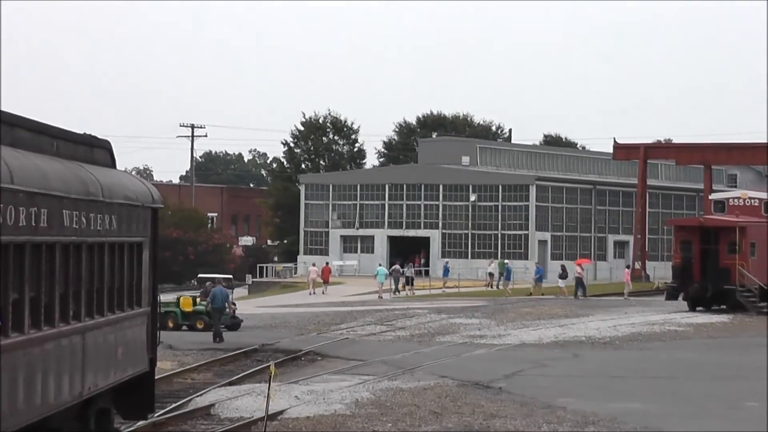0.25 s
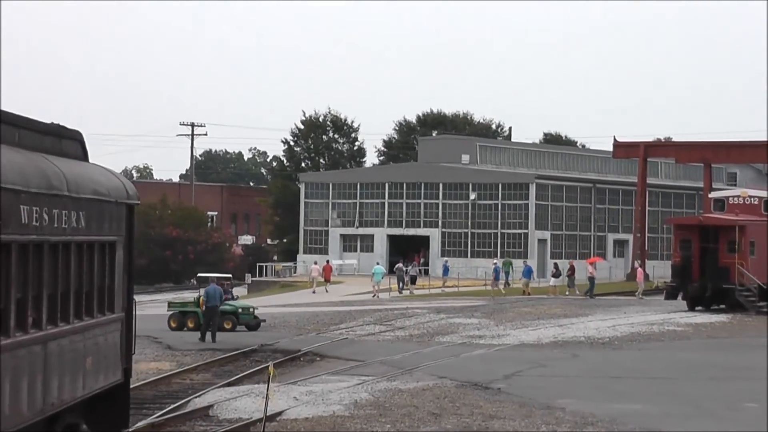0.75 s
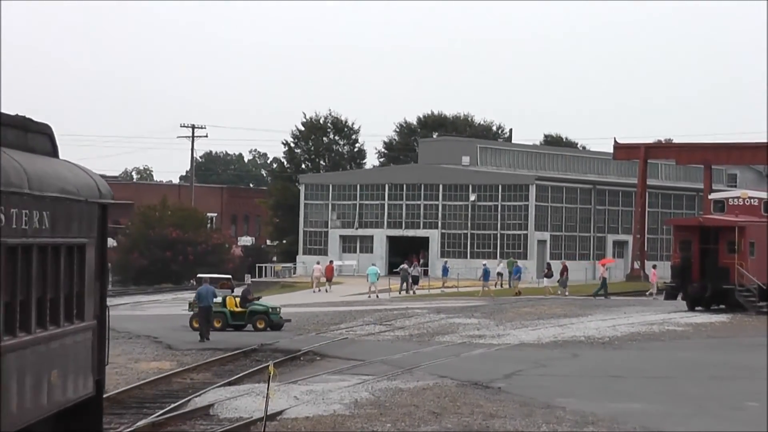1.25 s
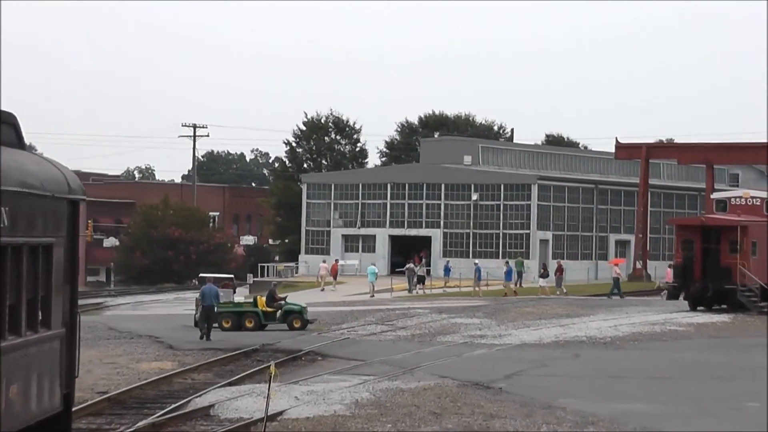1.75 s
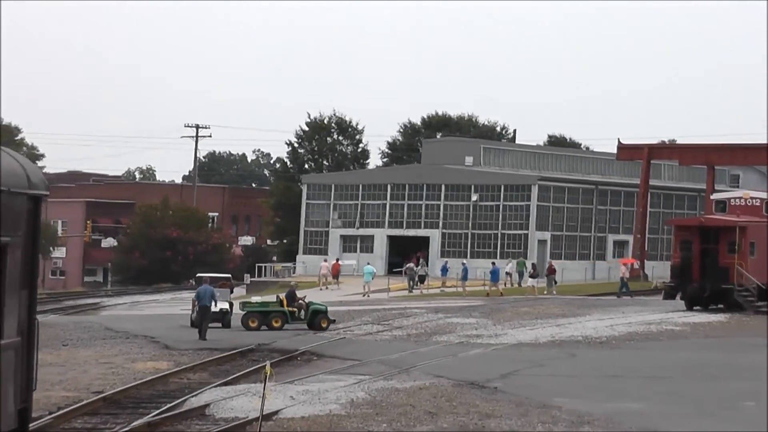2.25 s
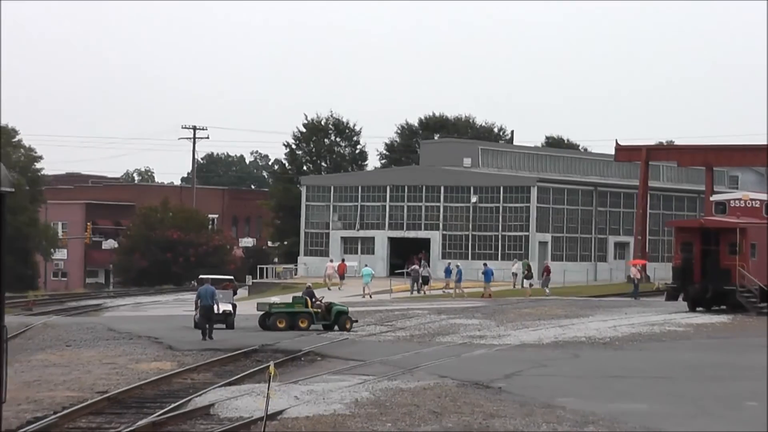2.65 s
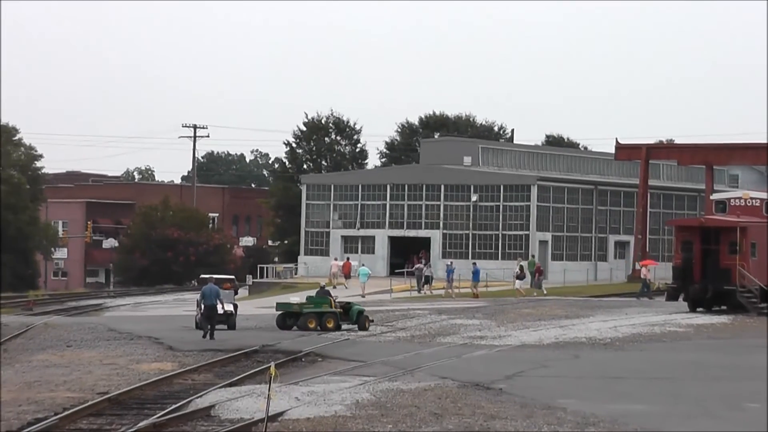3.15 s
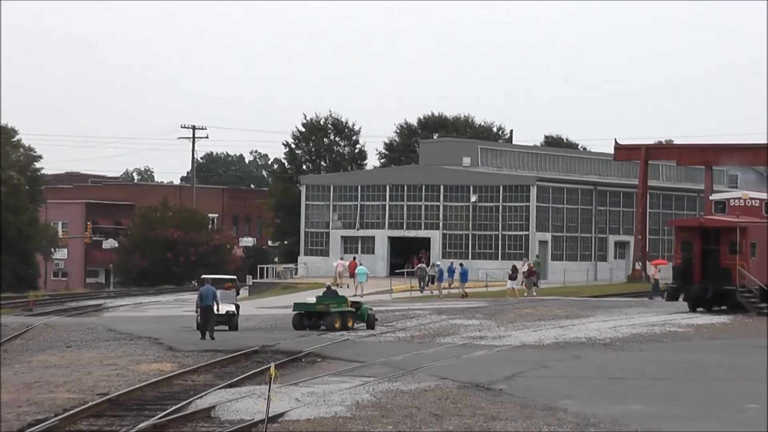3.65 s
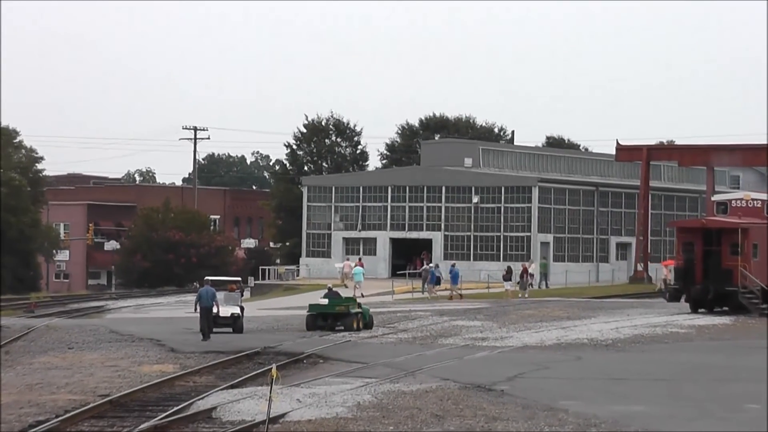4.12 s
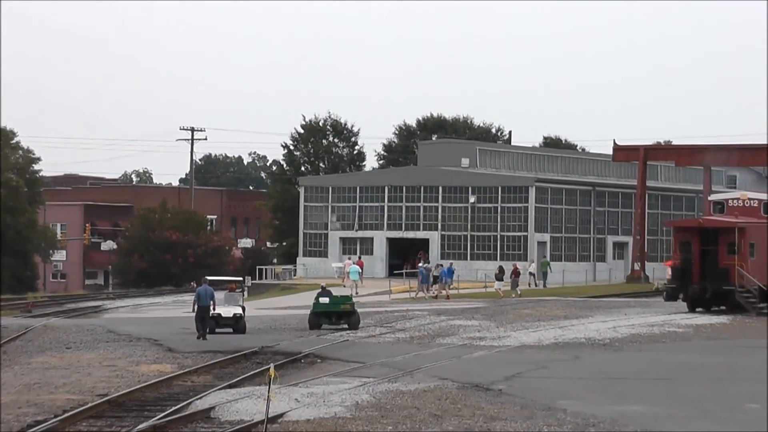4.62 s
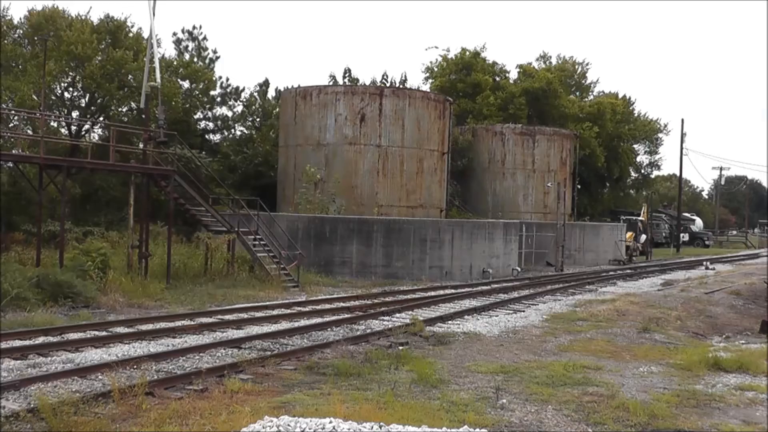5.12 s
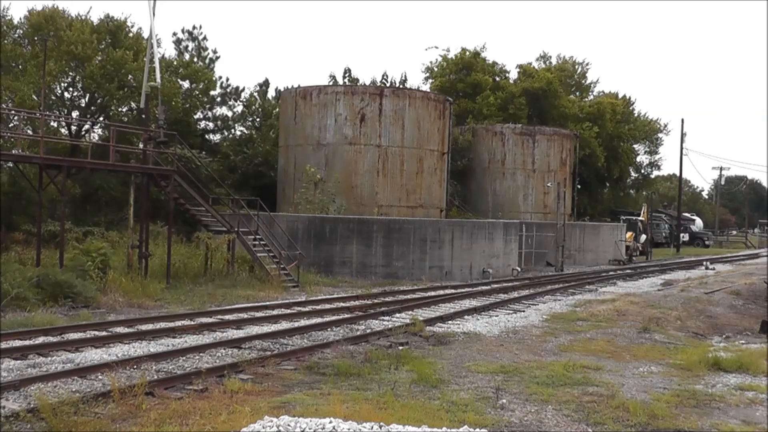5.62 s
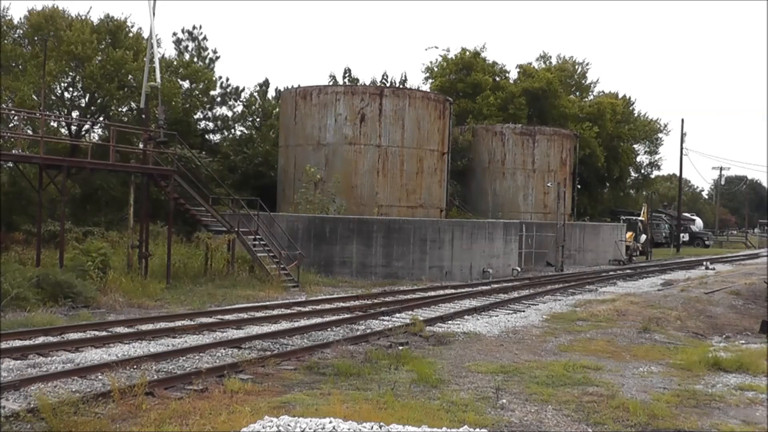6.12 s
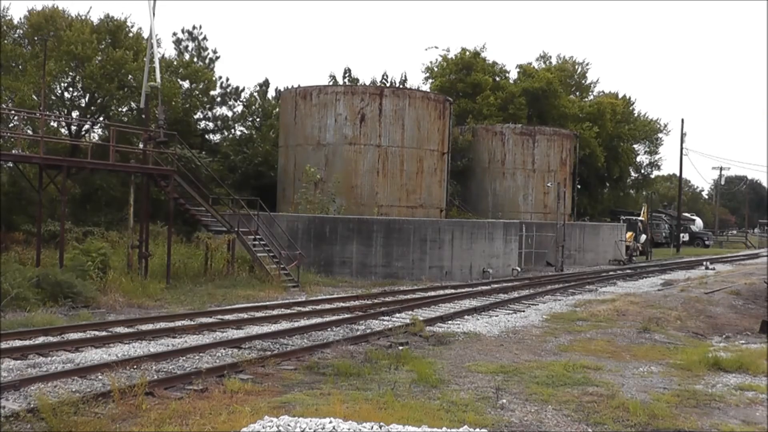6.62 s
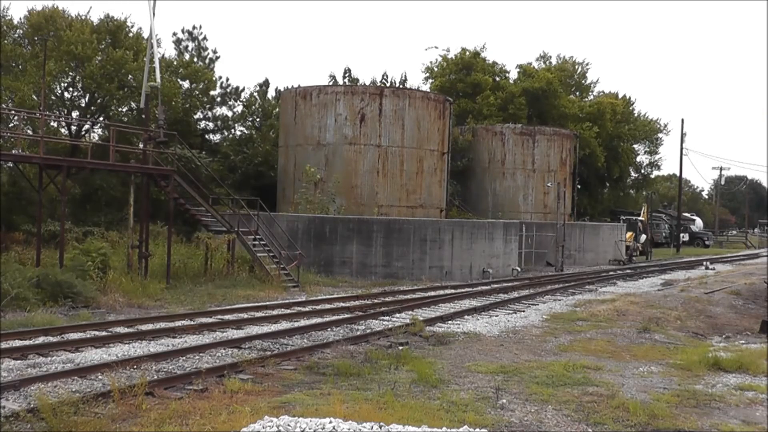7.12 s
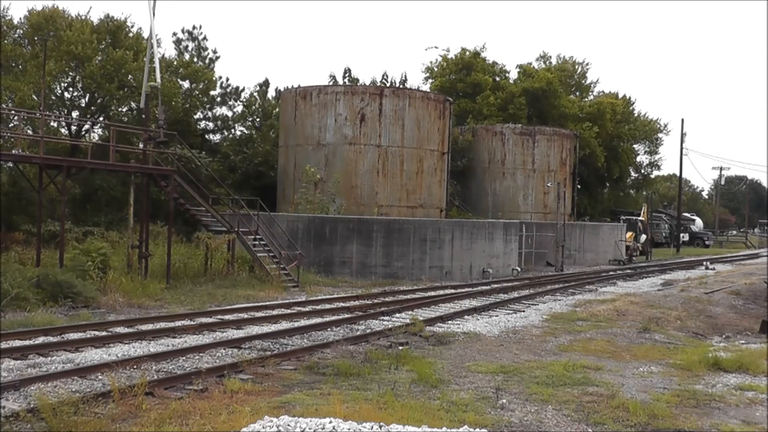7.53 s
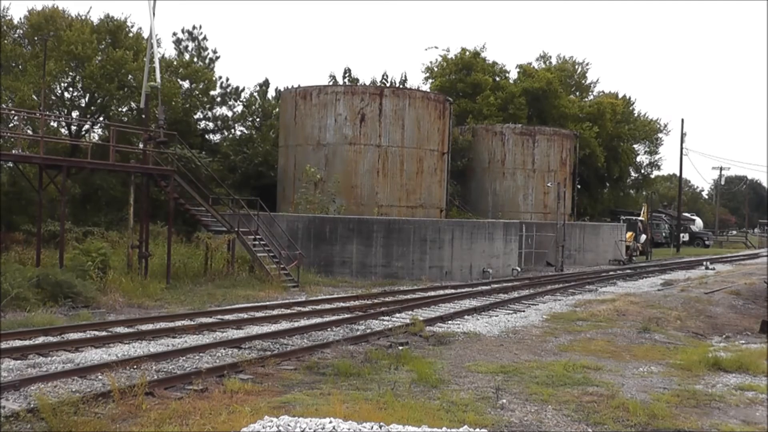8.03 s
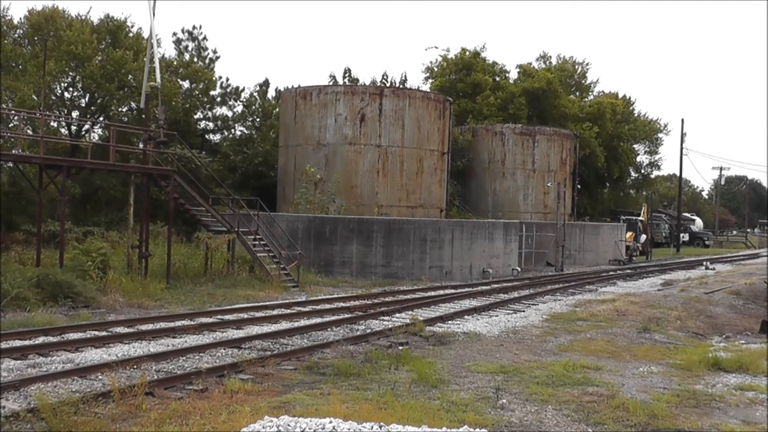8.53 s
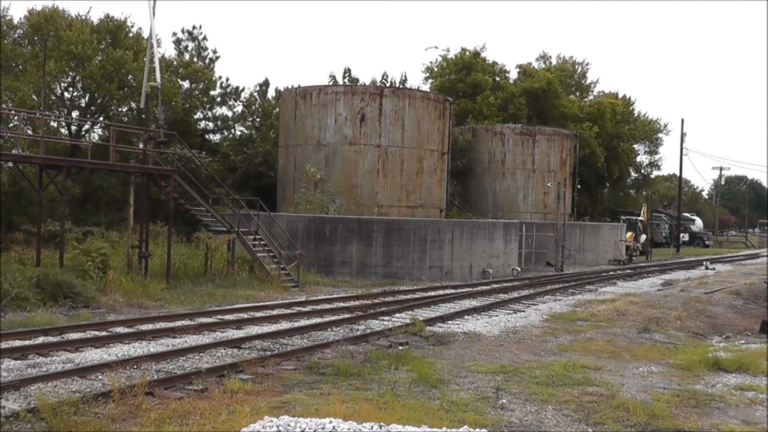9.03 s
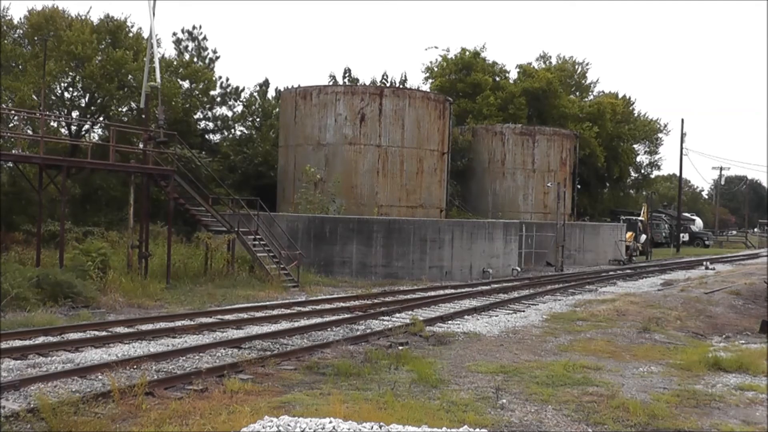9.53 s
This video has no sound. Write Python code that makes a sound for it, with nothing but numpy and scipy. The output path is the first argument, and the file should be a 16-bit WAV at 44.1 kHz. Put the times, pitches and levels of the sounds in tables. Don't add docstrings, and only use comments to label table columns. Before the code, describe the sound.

Close heavy wheels rumble, clank and squeak over rail joints, cut to silence, then far-off rolling fades up with a chirping cricket.

```python
import sys
import numpy as np
from scipy import signal
from scipy.fft import rfft, irfft
from scipy.io import wavfile
from scipy.ndimage import uniform_filter1d

SR = 44100
rng = np.random.default_rng(int(sys.argv[2]) if len(sys.argv) > 2 else 0)


def unload_wav(signal):
    wavfile.write(
        sys.argv[1],
        SR,
        np.round(np.clip(np.atleast_2d(signal).T, -1, 1) * 32767).astype(np.int16),
    )


def volts(x):
    e = np.asarray(x, float) / 20
    return 10 ** e


N = 430857
TIME, HZ = np.arange(N) / SR, np.fft.rfftfreq(N, 1 / SR)


def over_hz(table, hz=HZ):
    f, v = np.transpose(table)
    return np.interp(np.log(hz + 1), np.log(f), v)


def add(track, start_s, sound):
    i = int(start_s * SR)
    track[i:i + len(sound)] += sound[:N - i]


def band(x, lo_hz, hi_hz, order=2):
    sos = signal.butter(order, [lo_hz, min(hi_hz, .45 * SR)], "bandpass", fs=SR, output="sos")
    return signal.sosfilt(sos, x)


def patches(shape, size):
    field = uniform_filter1d(rng.standard_normal(shape), size[0], axis=0)
    field = uniform_filter1d(field, size[1], axis=1)
    return field / field.std()


def thin_hiss(curve, tilt_db):
    # pitch in Hz, level in dB per Hz
    hiss_colour = [(6500, -30), (9000, 0), (11500, -7), (13300, -11), (15600, -17)]
    colour_db = over_hz(hiss_colour) + tilt_db * HZ / 15000
    hiss = irfft(rfft(rng.standard_normal((2, N))) * volts(colour_db), N)
    puff_start_s, puff_end_s, puff_db = 2.435, 2.6, -53
    puff_times = [puff_start_s - .01, puff_start_s, puff_end_s, puff_end_s + .02]
    puff = volts(puff_db) * np.interp(TIME, puff_times, [0, 1, .7, 0])
    steady = volts(np.interp(TIME, *np.transpose(curve)) - 7)
    return hiss / hiss.std() * (steady + puff)


def cricket():
    # start in seconds, level in dB
    chirp_rows = [
        (5.335, -82),
        (5.637, -71),
        (5.948, -68),
        (6.262, -67),
        (6.55, -68),
    ]
    pitch_hz, gap_s, pulse_s = 6830, .0275, .014
    out, t = np.zeros(N), TIME[:int(pulse_s * SR)]
    stroke = np.hanning(len(t)) * np.sin(2 * np.pi * pitch_hz * t)
    for s, db in chirp_rows:
        for k, stroke_db in enumerate((6, 6.5, 4, 7)):
            add(out, s + k * gap_s, volts(db + stroke_db) * stroke)
    return out


def rolling(curves, parts_db, colour, rings, grit_hz, grit_db, spread_db, patchy_db, flicker_db):
    edges = (60, 280, 900, 3000, 9000)
    # middle in seconds, half length in seconds, swell of the load in dB, swell of the grind in dB
    bogie_rows = [(0.26, 0.14, 5.5, 3), (0.614, 0.055, 5, 3.5), (1.1, 0.19, 6, 2), (1.43, 0.15, 7.5, 4),
                  (1.864, 0.1, 8.5, 4), (2.233, 0.074, 3.5, 0), (2.527, 0.12, 5.5, 3), (2.84, 0.18, 7, 7),
                  (3.54, 0.12, 3, 2.5), (3.755, 0.12, 0.5, 0), (4.152, .07, 2.5, 5), (5.92, 0.072, 2.5, 0),
                  (6.716, 0.096, 1.5, 3), (7.11, .05, 0.5, 2), (7.27, 0.092, 0, 4), (7.472, 0.055, 3, 2)]
    grind_shares = (0, .1, 1, 1.1)

    knocks = (rng.random(N) < grit_hz / SR) * volts(spread_db * np.minimum(rng.exponential(size=N), 2))
    smear = np.exp(-np.arange(400) / (0.00084 * SR))
    roughness = 1 + volts(grit_db) * signal.fftconvolve(knocks, smear)[:N]
    db = over_hz(colour) + sum(d / (1 + (2 * (HZ - f) / w) ** 2) for f, w, d in rings)
    spectra = rfft(rng.standard_normal((2, N)) * roughness) * volts(db)
    power = np.mean(abs(spectra) ** 2, axis=0) * 2 / N ** 2
    own_db = [10 * np.log10(power[(HZ > a) & (HZ < b)].sum()) for a, b in zip(edges, edges[1:])]

    hz, s, cells = signal.stft(irfft(spectra, N), SR, nperseg=1024)
    times, load, grind = np.transpose(curves)
    middle, half, *swells_db = np.transpose(bogie_rows)
    heavier, rougher = swells_db @ np.exp(-((s - middle[:, None]) / half[:, None]) ** 2)
    gains = []
    for part, share, own in zip(parts_db, grind_shares, own_db):
        swell = heavier + share * (rougher - heavier)
        gains.append(np.interp(s, times, load + share * grind) + swell + part - own)
    gains = np.array(gains)
    centres_hz = np.sqrt(np.multiply(edges[1:], edges[:-1]))
    place = np.interp(np.log(hz + 1), np.log(centres_hz), range(4))
    low = np.minimum(place.astype(int), 2)
    gain_db = gains[low] + (place - low)[:, None] * (gains[low + 1] - gains[low])
    gain_db += patchy_db * patches(gain_db.shape, size=(3, 8))
    gain_db += flicker_db * patches(gain_db.shape, size=(60, 2))
    return signal.istft(cells * volts(gain_db), SR, nperseg=1024)[1][:, :N]


def far_rolling():
    # time in seconds, load on the rail in dB, grind of the treads against that load in dB
    far_curve = [(5.3, -49, -10.5), (5.45, -45.5, -9.5), (6, -40, -8), (6.5, -33, -8.5), (6.9, -29.5, -9.5),
                 (7.3, -28.5, -6), (7.7, -28, -8.5), (8.9, -25, -9.5), (9.77, -27, -8)]
    # pitch in Hz, level in dB per Hz
    far_colour = [(15, -46), (25, -13.5), (69, -4), (126, -3), (221, -7.5), (253, -2.5), (289, -9),
                  (433, -7), (614, -10.5), (803, -8.5), (970, -9.5), (1410, -6), (4620, -43.5),
                  (7490, -50.5), (15500, -69)]
    # pitch in Hz, width in Hz,
    # level in dB
    far_rings = [(129, 180, 10), (250, 21, -2.5), (439.4, 35, 4.5), (756, 55, 1.5), (1790, 150, 1.5),
                 (5820, 71, -1), (4810, 700, -3), (2220, 300, -2.5), (7600, 540, 4.5)]
    parts_db = (-3, -4.5, -3, -10.5)
    train = rolling(far_curve, parts_db, far_colour, far_rings, grit_hz=41.0, grit_db=-18,
                    spread_db=2.0, patchy_db=0.83, flicker_db=1.0)
    top_hiss = band(rng.standard_normal((2, N)), 13000, 17000, order=3)
    top_hiss_db = -42.5 + np.interp(TIME, *np.transpose(far_curve)[:2])
    return train + volts(top_hiss_db) * top_hiss / top_hiss.std()


def near_rolling():
    # time in seconds, load on the rail in dB, grind of the treads against that load in dB
    near_curve = [(0, -21, -6.5), (.7, -22.5, -6.5), (1.6, -25.5, -1.5), (2.1, -24, -2), (2.7, -25, -6.5),
                  (3.15, -22.5, -7), (3.95, -24.5, -6.5), (4.27, -32, -6.5), (4.55, -32.5, -5)]
    # pitch in Hz, level in dB per Hz
    near_colour = [(15, -55.5), (25, -31.5), (198, 0.5), (340, -7.5), (433, -7.5), (1050, -23), (1200, -23),
                   (1300, -25.5), (2170, -26.5), (2420, -25.5), (3340, -24), (4490, -22.5), (7700, -29),
                   (13200, -58), (15500, -76)]
    # pitch in Hz, width in Hz,
    # level in dB
    near_rings = [(200, 110, -3.5), (428, 54, 1), (5860, 80, 2.5)]
    parts_db = (-2, -3, -1.5, -8)
    return rolling(near_curve, parts_db, near_colour, near_rings, grit_hz=60, grit_db=-28.5,
                   spread_db=8.5, patchy_db=2.5, flicker_db=1.0)


def ticks():
    # time in seconds, peak in dB, lowest pitch in Hz
    tick_rows = [(0.0008, -33.5, 6000), (0.2653, -33, 7000), (0.7005, -28, 5000), (1.5525, -45.5, 6000),
                 (1.7709, -32.5, 7500), (1.9275, -44, 6000), (2.0542, -40.5, 5000), (2.2483, -32.5, 5000),
                 (2.395, -41.5, 3000), (2.7482, -36.5, 7000), (4.2792, -50, 6000)]
    rise_s = .0004
    out, t = np.zeros(N), TIME[:400]
    shape = t / rise_s * np.exp(1 - t / rise_s)
    for (s, db, lo_hz), noise in zip(tick_rows, rng.standard_normal((len(tick_rows), len(t)))):
        crack = band(noise, lo_hz, 12500., order=1)
        add(out, max(s - rise_s, 0), volts(db) * shape * crack / crack.std())
    return out


def faint_squeaks(level_db, count):
    wheel_modes_hz = (2950, 3700, 4100, 4350, 4600, 4820, 5140, 5280, 5600, 6050, 6450, 7100, 7450, 7650,
                      7900, 8400)
    s, length, mode, size = rng.random((count, 4)).T
    hz = np.take(wheel_modes_hz, (mode * len(wheel_modes_hz)).astype(int))
    db = level_db + 5 * size - 12 * s ** 2 - hz / 800
    return list(zip(3.6 * s, .03 + 0.082 * length, hz, db))


def squeaks():
    # start in seconds, length in seconds, pitch in Hz, average level in dB
    near_songs = [(0.09, 0.18, 5100, -44.5), (0.616, 0.033, 4140, -29), (0.747, 0.17, 7600, -49.5),
                  (0.81, 0.09, 4800, -41), (0.85, 0.044, 5480, -45), (1.26, 0.037, 1515, -33),
                  (1.551, 0.086, 4250, -36.5), (1.623, 0.14, 5530, -47), (1.67, 0.039, 7940, -49),
                  (1.94, 0.015, 5800, -32.5), (1.975, 0.06, 5590, -35), (1.93, 0.04, 4530, -31),
                  (1.97, 0.058, 8000, -43), (2.172, 0.031, 4660, -41), (2.233, 0.098, 6100, -48.5),
                  (2.282, 0.044, 4480, -38.5), (2.43, 0.062, 5250, -37.5), (2.439, 0.067, 7430, -42),
                  (2.44, 0.03, 4350, -34.5), (3.057, 0.043, 5570, -46), (3.64, 0.041, 5520, -43),
                  (4.234, 0.085, 4080, -48.5), (2.17, .012, 800, -33), (0.045, .04, 2000, -36),
                  (0.05, .04, 3900, -38), (0.17, .05, 5200, -44), (1.61, .05, 7800, -46),
                  (1.575, .06, 2050, -38), (2.17, .05, 8300, -48), (2.22, .04, 7500, -46),
                  (2.29, .04, 5600, -46), (2.3, .03, 1570, -36), (1.7, .06, 5610, -45.5),
                  (0.099, .05, 4600, -42.5)]
    far_songs = [(6.69, .13, 5700, -66), (6.71, .08, 6500, -65), (6.72, .05, 6800, -68),
                 (6.7, .06, 8300, -70), (6.69, .07, 4930, -68), (6.709, .018, 2230, -44),
                 (6.81, .08, 4940, -64), (6.82, .04, 6550, -69), (6.9, .05, 5820, -69),
                 (7.03, .05, 5800, -65), (7.13, .1, 5820, -67), (7.25, .08, 5800, -63),
                 (7.35, .12, 5820, -63), (7.23, .09, 7620, -65), (7.38, .08, 7640, -66),
                 (7.27, .2, 6480, -67), (7.48, .08, 8300, -71), (7.58, .05, 6850, -69),
                 (7.09, .03, 4650, -61), (7.46, .05, 4950, -67)]
    hum_rows = [
        (0.406, 0.18, 425.5, -33),
        (6.587, 0.7, 250, -51),
        (7.495, 0.73, 250, -50),
        (8.096, .5, 425.6, -44.5),
        (8.595, .45, 396, -38.5),
        (8.499, 0.67, 250, -40),
        (9.252, .4, 798, -45.5),
    ]
    out = np.zeros(N)
    for s, length, hz, db in near_songs + far_songs + hum_rows + faint_squeaks(-47, count=80):
        t = TIME[:min(int(length * 1.15 * SR), SR)]
        slip = uniform_filter1d(rng.standard_normal((2, SR))[:, :len(t)], size=250) * np.sqrt(250)
        tone = np.sin(2 * np.pi * np.cumsum(hz + (10 + .003 * hz) * slip[0]) / SR)
        add(out, s, volts(db + 6.5 + 3.2 * slip[1]) * signal.windows.tukey(len(t), .5) * tone)
    return out


def squeal():
    # time in seconds, pitch in Hz, average level in dB, second partial over the first in dB
    squeal_rows = [
        (1.91, 1170, -35.5, 4.5),
        (1.945, 1166, -29, -1),
        (1.99, 1174, -27, -6),
        (2.055, 1172, -38.5, 2),
        (2.11, 1177, -33, 3),
        (2.15, 1181, -25, -3),
        (2.235, 1200, -28.5, -8.5),
        (2.3, 1212, -33, -9),
        (2.41, 1230, -39, -14),
    ]
    s, hz, level_db, second_db = np.transpose(squeal_rows)
    rough = uniform_filter1d(rng.standard_normal((3, N)), size=400) * np.sqrt(400)
    phase = 2 * np.pi * np.cumsum(np.interp(TIME, s, hz) * (1 + .004 * rough[0])) / SR
    third_db = -20 + 25 * (s - s[0])
    tones = np.zeros(N)
    for k, over_db in enumerate([0 * s, second_db, third_db], 1):
        grip_db = np.interp(TIME, s, level_db + over_db) + 2.2 * rough[1 + k % 2]
        tones += volts(grip_db) * np.sin(k * phase)
    fade = np.interp(TIME, [s[0] - .01, s[0], s[-1] - .03, s[-1]], [0, 1, 1, 0])
    return np.sqrt(2) * fade * tones


def clanks():
    # time in seconds, peak in dB, centre pitch in Hz, rattle length in seconds
    near_clanks = [(0.0217, -4, 1940, 0.014), (0.0644, -21.5, 1930, 0.012), (0.2644, -18, 3107, 0.018),
                   (0.355, -9, 3084, 0.025), (0.4155, -19, 3900, 0.019), (0.5725, -14, 2520, .016),
                   (0.6119, -7.5, 3676, 0.021), (0.6914, -7.5, 2910, 0.02), (0.7394, -13.5, 3264, 0.018),
                   (0.8813, -8, 2770, 0.01), (1.0694, -19.5, 2360, .013), (1.3283, -13, 2373, .014),
                   (1.4894, -21.5, 1893, 0.011), (1.527, -13, 1920, 0.0097), (1.5513, -6, 3940, 0.0073),
                   (1.5832, -8, 2083, .012), (1.8994, -18, 2350, 0.061), (1.9259, -3.5, 2496, .014),
                   (2.0461, -10.5, 2945, .023), (2.2447, -3.5, 2670, 0.012), (2.3914, -13, 1760, .014),
                   (2.4417, -8, 4370, 0.005), (2.5935, -18.5, 1673, 0.017), (2.7481, -11, 1945, .014),
                   (2.8824, -14, 1810, 0.011), (2.9406, -16, 1594, 0.016), (3.1094, -29, 1990, 0.022),
                   (3.4864, -17.5, 1966, .021), (3.8326, -15.5, 1786, 0.0096), (4.2237, -12.5, 3220, 0.009),
                   (0.0167, -7.5, 2300, .006), (0.0307, -11, 1400, .007), (0.3747, -15.5, 3500, .01),
                   (0.2234, -14.5, 2000, .008), (0.5601, -18, 2530, .008), (0.6993, -6, 3290, .006),
                   (1.6671, -15.5, 2150, .006), (1.729, -16.5, 2200, .006), (2.7551, -15.5, 1940, .008),
                   (3.1313, -22, 2720, .008), (4.0452, -24.5, 1910, .008)]
    # time in seconds, peak in dB
    far_clanks = [(6.6648, -24), (6.7158, -26), (7.0574, -21), (7.1055, -18), (7.1216, -20.5),
                  (7.1436, -27), (7.2344, -24), (7.2594, -19), (7.2794, -26), (7.2974, -29), (7.3334, -23),
                  (7.3634, -24), (7.4272, -29), (7.4497, -20), (7.4707, -23), (7.617, -26), (7.8288, -33),
                  (7.9959, -27), (8.3257, -24), (8.4848, -22), (8.6963, -33), (8.8802, -25), (8.9104, -31),
                  (8.9712, -32), (9.6332, -35)]
    far_hz, far_rattle_s = 1770, 0.0063
    snap_db, snap_s = -28.5, 0.005
    out, t = np.zeros(N), TIME[:8000]
    blows = near_clanks + [(s, db, far_hz, far_rattle_s) for s, db in far_clanks]
    for (s, db, hz, length), noise in zip(blows, rng.standard_normal((len(blows), len(t)))):
        rattle = volts(4.0 * uniform_filter1d(noise[::-1], size=80) * np.sqrt(80))
        tail = volts(-6.0) * np.exp(-t / 0.033)
        shape = (1 - np.exp(-t / 0.0042)) * (rattle * np.exp(-(t / length) ** 2) + tail)
        body = band(noise, hz / 4.5, hz * 1.56, order=3)
        top = band(noise, hz * 1.5, 6900.0, order=3)
        snap = volts(snap_db) * hz / 3000 * t / snap_s * np.exp(1 - t / snap_s) * top / top.std()
        add(out, s - .004, volts(db - 11.5) * (shape * body / body.std() + snap))
    return out


def flats():
    # first blow in seconds, last blow in seconds, first peak in dB, last peak in dB, pitch in Hz
    flat_rows = [
        (0.018, 0.694, -5, -6.5, 440),
        (0.299, 1.325, -5.5, -7.5, 188),
        (1.143, 1.488, -4.5, -2, 442),
        (1.833, 3.233, -4, -13.5, 195),
        (1.518, 1.878, -8.5, -12, 290),
        (2.239, 2.945, -6, -2, 300),
        (3.837, 4.195, -6, -12, 200),
    ]
    turn_s = .348
    blows = []
    for first, last, first_db, last_db, hz in flat_rows:
        knock_db = -8.5 + 2 * np.log2(hz / 200)
        for u in np.linspace(0, 1, round((last - first) / turn_s) + 1):
            blows.append((first + u * (last - first), first_db + u * (last_db - first_db), hz, knock_db))
    return blows


def thuds():
    # time in seconds, peak in dB, pitch in Hz, knock of the upper mode in dB
    joint_rows = [(0.213, -2.5, 250, -18), (1.07, -10, 124, -14), (1.106, -9.5, 304, -6),
                  (1.395, -11, 200, -10), (2.014, -7, 200, -19), (2.485, 3, 185, -24),
                  (2.629, -8, 207, -10), (2.713, -7, 230, -34.5), (2.759, -8, 184, -13.5),
                  (3.054, 0.5, 172, -17.5), (3.107, -17, 556, 0), (3.439, -9.5, 139, -25.5),
                  (3.637, -6, 217, -27), (3.668, -6.5, 162, -32.5), (3.706, -11, 174, -34),
                  (4.147, -11.5, 243, -28), (4.376, -20, 179, -25), (4.452, -19.5, 198, -16.5),
                  (5.891, -25, 142, -13.5), (6.389, -28.5, 135, -2), (6.542, -26.5, 137, -27),
                  (6.663, -16, 140, -16), (7.362, -17.5, 464, -27), (7.445, -25.5, 132, 2.5),
                  (7.535, -16, 140, -24), (7.647, -17.5, 140, -27), (7.884, -20, 190, -16),
                  (8.646, -13, 116, -24.5), (8.802, -32, 250, -21), (9.682, -28, 129, -19),
                  (4.556, -15, 285, -8.5), (4.19, -14.5, 400, -11.5), (1.79, -12.5, 270, -11),
                  (2.3, -11, 390, -13), (0.37, -9, 280, -10), (4.474, -21.5, 190, -8),
                  (4.42, -22, 230, -15)]
    out, t = np.zeros(N), TIME[:6000]

    def swell(tau):
        return (t / tau * np.exp(1 - t / tau)) ** 2

    blows = joint_rows + flats()
    chance = rng.random((len(blows), 2))
    for (s, db, hz, knock_db), (turn, detune) in zip(blows, chance):
        low = swell(0.005 + 0.08 / hz) * np.sin(2 * np.pi * (hz * t + turn))
        knock = swell(0.0045) * band(rng.standard_normal(len(t)), 420 + 100 * detune, 750) * 5
        add(out, s, volts(db - 3.5) * (low + volts(knock_db + 6.0) * knock))
    return out


def ports(direct, scattered, alike):
    # pitch in Hz, left minus right in dB
    balance_db = [(60, -.8), (200, -.3), (380, 1), (700, 4), (1290, 6.5), (2380, 5), (4400, 2), (8120, 1.8),
                  (15000, 1.5)]
    # pitch in Hz, lead of the left in radians
    lead_rows = [(60, 0.28), (250, 0.58), (500, 0.092), (860, 0.65), (1640, 0.47), (2500, 0.85),
                 (6000, -0.021)]
    c = np.sqrt(np.clip(over_hz(alike), 0, .999))
    same, other = np.sqrt((1 + c) / 2), np.sqrt((1 - c) / 2)
    left = volts(over_hz(balance_db) / 2) * np.exp(.5j * over_hz(lead_rows))
    right = 1 / left
    mid = np.hypot(same * abs(left + right), other * abs(left - right)) / 2
    a, b = same * rfft(direct) / mid, other * rfft(scattered) / mid
    return irfft([left * (a + b), right * (a - b)], N)


def scene():
    # time in seconds, level in dB
    hiss_curves = [
        [(0.0, -56.5), (0.58, -65.5), (1.86, -54.5), (2.42, -50), (2.65, -45), (3.18, -47), (3.45, -41.5),
         (4.41, -52), (4.46, -55)],
        [(5.3, -90), (5.42, -78.5), (5.7, -70.5), (6.03, -64.5), (6.76, -69.5), (7.17, -74.5), (7.4, -64.5),
         (9.06, -69), (9.77, -64.5)],
    ]
    # pitch in Hz, likeness from 0 to 1
    near_alike = [(60, .8), (130, .96), (290, .94), (550, .82), (1100, .1), (1800, .3), (3100, .9),
                  (5500, .85), (9000, .4), (13000, .55)]
    # pitch in Hz, likeness from 0 to 1
    far_alike = [(60, 0.65), (130, 0.65), (290, 0.75), (640, 0.2), (1410, 0.8), (3100, 0.36), (6820, 0.8),
                 (15000, 0.69)]
    cut_s, fade_up_s, fade_steps_hz = 4.5845, 5.0762, 29.97

    hits = thuds() + clanks() + squeaks() + squeal() + cricket()
    hits = band(hits, 30, 13000) + ticks()
    turns = np.interp(HZ, np.arange(0, SR, 150), 2 * rng.standard_normal(SR // 150))
    hits = np.array([hits, irfft(rfft(hits) * np.exp(1j * turns), N)])
    near = near_rolling() + hits + thin_hiss(hiss_curves[0], tilt_db=-11.0)
    far = far_rolling() + hits + thin_hiss(hiss_curves[1], tilt_db=18)
    near, far = ports(*near, near_alike), ports(*far, far_alike)

    trace_fade = np.interp(TIME, [cut_s + 0.014, cut_s + 0.024], [1, 0])
    trace = volts(-24.5) * band(near, 130, 1750, order=6) * trace_fade
    before = np.where(TIME < cut_s, near * np.minimum((cut_s - TIME) * 500, 1), trace)
    step = np.maximum((TIME - fade_up_s) * fade_steps_hz + 1, 0)
    return before + far * np.floor(step) / np.maximum(step - .5, 7)


def starve(x, margin_db, top_db, scatter_db, keep):
    hz, s, cells = signal.stft(x, SR, nperseg=2048)
    power = np.mean(abs(cells) ** 2, axis=0)
    masker = uniform_filter1d(power[(hz > 1500) & (hz < 6000)].mean(axis=0), size=10)
    middle = np.minimum(np.arange(len(hz)) // 16 * 16 + 8, len(hz) - 1)
    scatter = scatter_db * rng.standard_normal(power.shape)[middle]
    need_db = margin_db + top_db * (hz[:, None] > 13400) + scatter
    smooth = uniform_filter1d(power, size=16, axis=0)[middle]
    spare = smooth / (masker * volts(2 * need_db))
    kept = (spare > 1) & ((power > keep * smooth) | (spare > volts(24)))
    return signal.istft(cells * (kept | (hz[:, None] < 9500)), SR, nperseg=2048)[1][:, :N]


def roll_off(x):
    return signal.sosfilt(signal.butter(12, 15740, fs=SR, output="sos"), x)


def record(dry):
    rounded = np.tanh(dry)
    starved = starve(rounded, margin_db=-41, top_db=9, scatter_db=5.5, keep=1.6)
    return roll_off(starved)


dry = scene()
out = record(dry)
unload_wav(out)
```